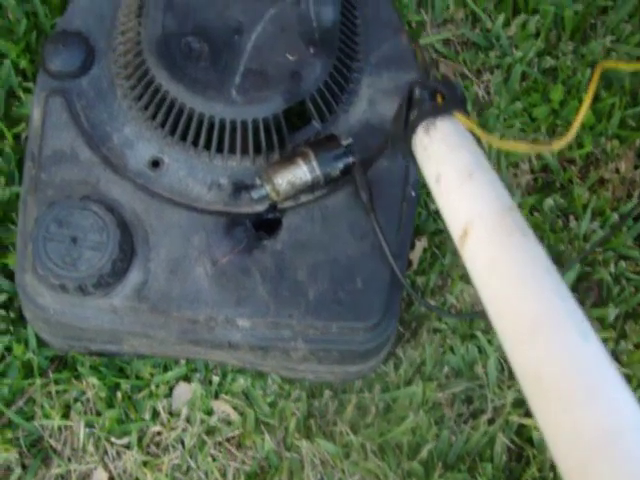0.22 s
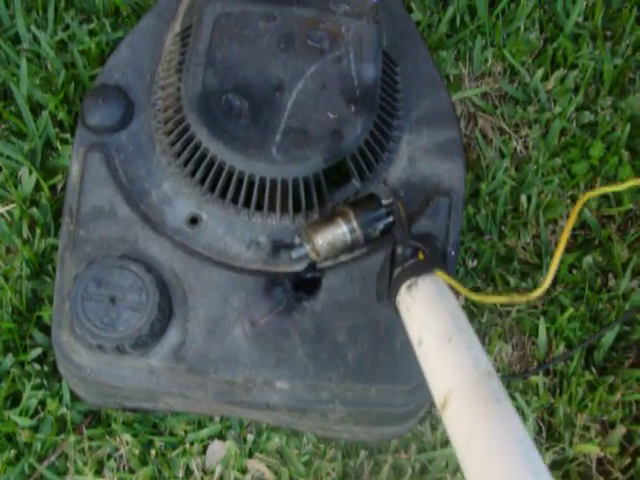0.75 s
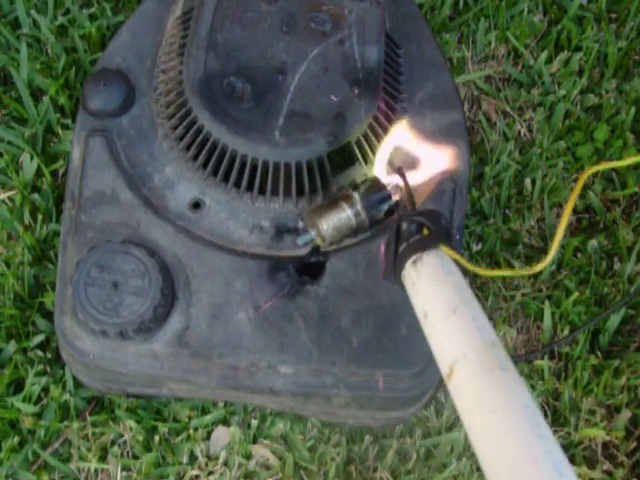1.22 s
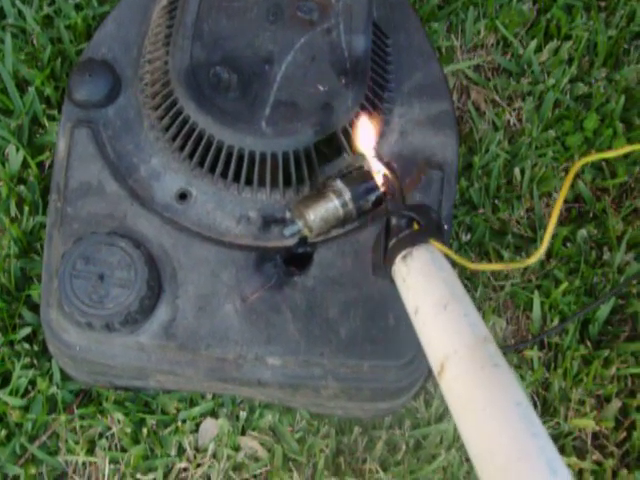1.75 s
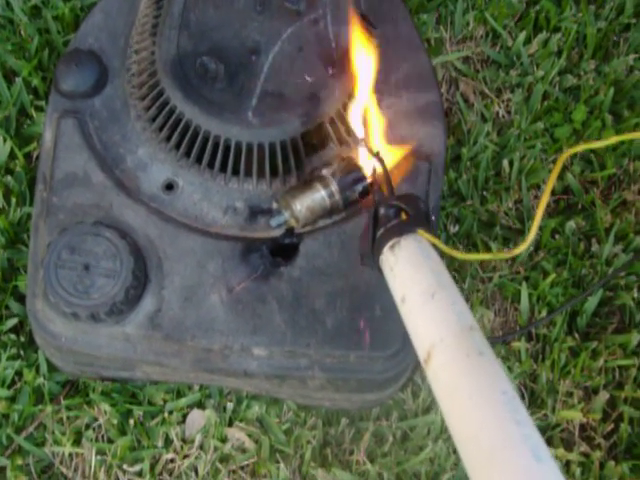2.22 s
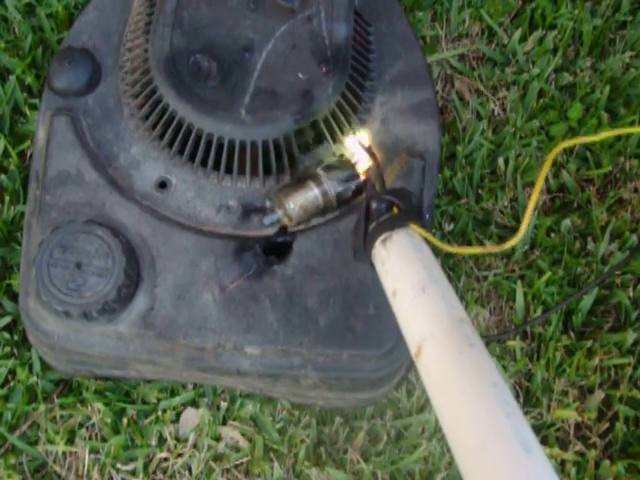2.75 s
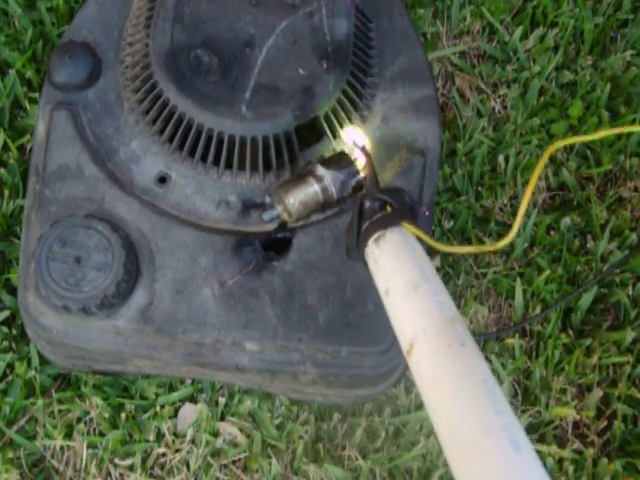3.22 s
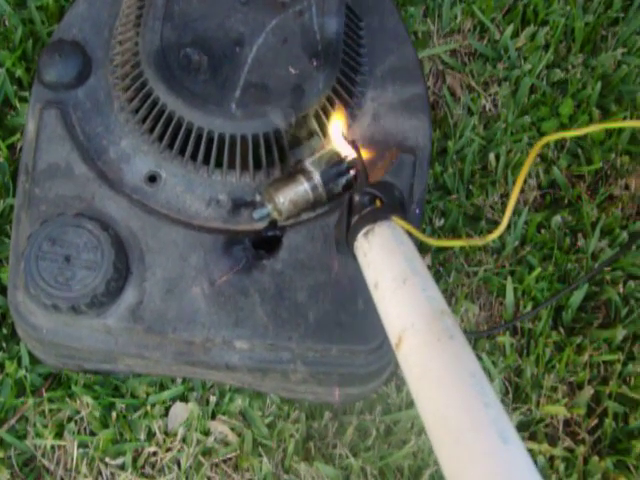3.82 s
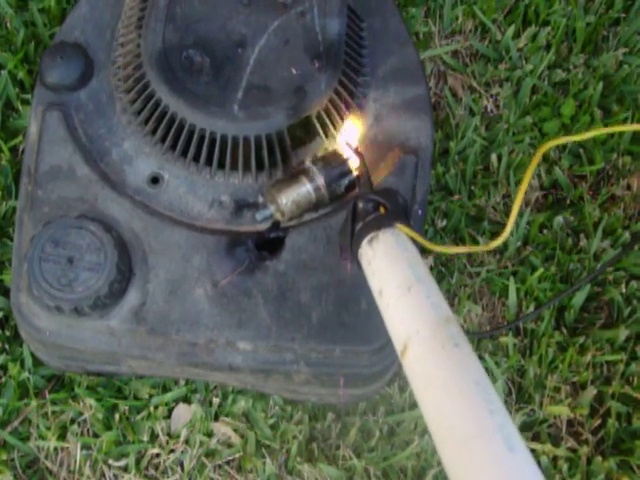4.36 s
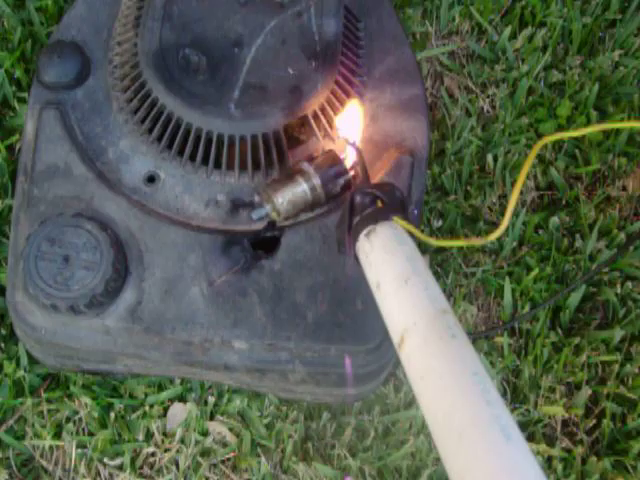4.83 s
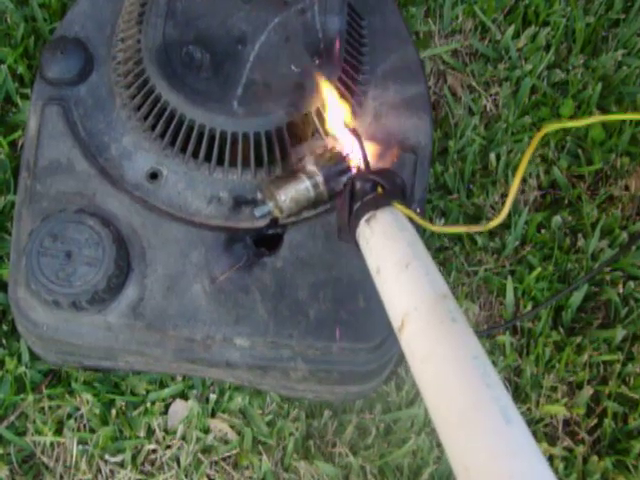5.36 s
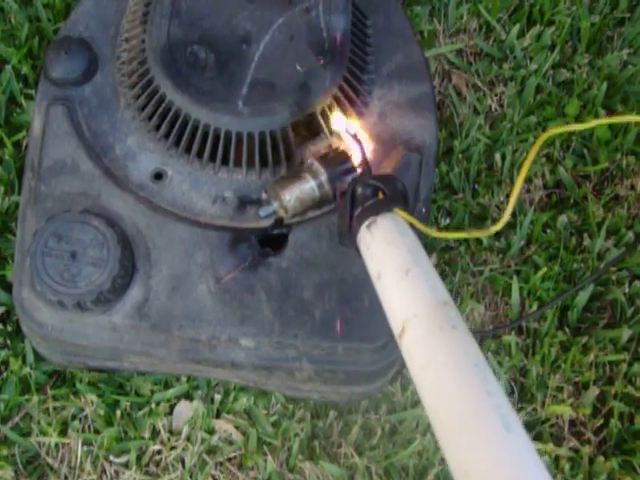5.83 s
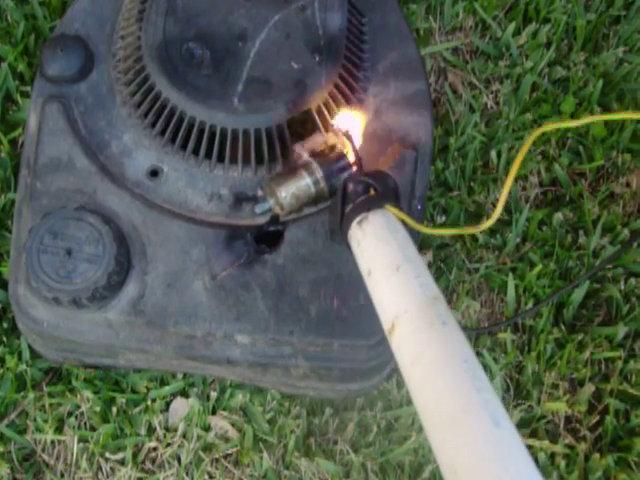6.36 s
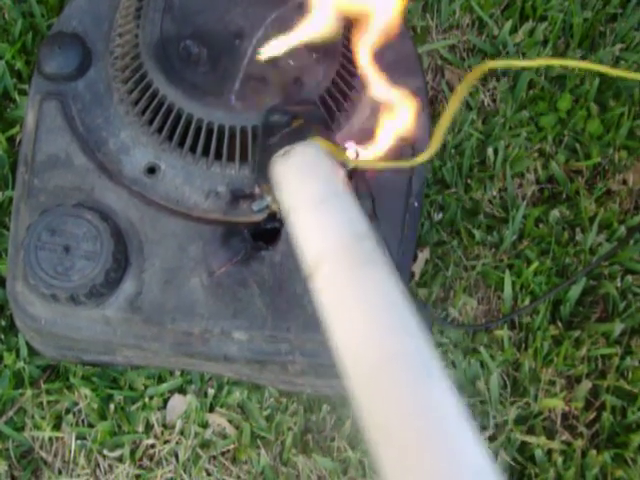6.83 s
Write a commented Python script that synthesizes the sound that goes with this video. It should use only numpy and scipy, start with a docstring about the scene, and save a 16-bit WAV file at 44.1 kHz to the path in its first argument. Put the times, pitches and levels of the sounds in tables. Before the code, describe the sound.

Outdoors, a low motor drone gives way to a loud, ragged mains-frequency electrical buzz full of snapping cracks, which abruptly cuts off.

```python
"""A small engine drones steadily throughout: uneven pops, noise and steady tones. The level of the drone, and
partly of the arc's hum, drops suddenly and creeps up again. A lone crack at 0.88 s precedes a high-voltage
mains arc, which burns from 1.12 s to 6.9 s between a hand-held probe and a small part on a plastic base, on a
lawn. Twice each mains cycle it restrikes: clicks crack and sizzle through resonances, pushes of heated air
thump the base, and sines hum and throb before each break of the flame. A narrow-band input clips the tallest
peaks."""
import sys
import numpy as np
from scipy import signal
from scipy.fft import rfft, irfft
from scipy.io import wavfile
from scipy.ndimage import uniform_filter1d

SR = 44100
rng = np.random.default_rng(int(sys.argv[2]) if len(sys.argv) > 2 else 0)


def unload_wav(signal):
    """Save mono or channel-first audio to the path in sys.argv[1] as 16-bit WAV at rate SR, clipped to [-1, 1]."""
    wavfile.write(
        sys.argv[1],
        SR,
        np.round(np.clip(np.atleast_2d(signal).T, -1, 1) * 32767).astype(np.int16),
    )


def boost_factor(decibels):
    """Convert a level in decibels to a linear amplitude factor."""
    exponent = np.asarray(decibels, float) / 20
    return 10 ** exponent


N = 312228

# the arc jumps to a new footing, then grows until the next jump: start_s, thump_db, sizzle_db (just after it)
JUMPS = [(1.122, -30, -37), (1.147, -24.0, -33.5), (1.189, -32, -44), (1.247, -26, -40),
         (1.288, -39.0, -43.0), (1.3, -32, -39.5), (1.389, -35.0, -41), (1.422, -28.0, -41),
         (1.53, -21.5, -32.5), (1.555, -26.0, -37), (1.589, -18.0, -35.5), (1.64, -16, -30),
         (1.68, -16.5, -23), (1.695, -40, -35.5), (1.722, -23.5, -32), (1.814, -32, -35),
         (1.85, -33.5, -39.5), (1.939, -19, -29.5), (1.996, -28.0, -35.5), (2.051, -18.0, -31.5),
         (2.092, -17, -27.5), (2.11, -23.5, -30.5), (2.172, -14.5, -31.0), (2.264, -28, -31),
         (2.288, -40, -39.5), (2.305, -25.5, -29), (2.355, -35, -35), (2.405, -40, -41),
         (2.439, -30.0, -43), (2.53, -28, -34.5), (2.595, -27, -36), (2.635, -24.5, -35),
         (2.73, -25, -36.5), (2.855, -16.5, -33.5), (2.883, -24.5, -39), (3.066, -23.5, -36.5),
         (3.11, -22.5, -42), (3.14, -23.5, -34.5), (3.205, -25.5, -36.0), (3.255, -20.0, -30.0),
         (3.372, -13.5, -26.5), (3.418, -30.5, -36.5), (3.447, -23.5, -31.5), (3.539, -25, -30),
         (3.572, -20.0, -34.5), (3.705, -23.5, -34), (3.776, -28.5, -37.5), (3.847, -22, -32.5),
         (3.922, -25.0, -39.5), (4.014, -23, -29.5), (4.114, -22.5, -28.5), (4.197, -20.5, -25.5),
         (4.255, -22.5, -32.5), (4.31, -13.5, -31), (4.329, -18, -27), (4.43, -29, -26),
         (4.464, -15.0, -28), (4.5, -29, -33), (4.514, -24.0, -32.5), (4.664, -25, -25.5),
         (4.697, -22.0, -32.0), (4.864, -22.5, -30.5), (4.914, -32.5, -25), (4.964, -18.5, -24.5),
         (5.005, -32, -27), (5.04, -22.5, -26), (5.059, -27, -33), (5.147, -22, -33), (5.325, -13, -27.5),
         (5.36, -16.5, -26), (5.389, -19.5, -28), (5.43, -28, -29.5), (5.489, -25, -37),
         (5.555, -25.5, -35), (5.583, -54, -41.5), (5.597, -28.5, -45), (5.647, -41, -34.5),
         (5.68, -23.5, -34), (5.714, -25.5, -30.5), (5.814, -17.5, -30.5), (5.855, -22.0, -28),
         (5.989, -25.5, -29.5), (6.014, -31.5, -27), (6.072, -21.5, -32), (6.155, -22.5, -28.0),
         (6.19, -13.5, -29.5), (6.207, -17.5, -30), (6.23, -18.5, -22), (6.247, -29, -35), (6.27, -28, -36),
         (6.3, -23.5, -36), (6.321, -42, -38), (6.341, -31, -38.0), (6.422, -27.5, -28.5),
         (6.548, -40, -40), (6.566, -30, -42), (6.614, -23.5, -38.5), (6.647, -28, -43),
         (6.675, -24.5, -42), (6.715, -36, -42.0), (6.73, -25.5, -47), (6.78, -37, -57),
         (6.805, -25.5, -46.0)]
# breakdown of the gap about each nominal current zero, later when the arc is long: time_s, lag_ms (< 0 early)
STRIKE_LAG = [(1.1, -.6), (1.8, -.5), (1.95, 1.2), (2.1, 1), (2.3, -.2), (2.5, -1.1), (3.4, -.6), (3.5, .5),
              (3.6, -.9), (3.85, -.8), (3.95, .3), (5.0, .3), (5.1, -1), (5.3, -.5), (5.4, 1), (5.7, 0),
              (6.9, .4)]
# how far the flame is drawn out, and the colour from where it lands on the part:
# time_s, added_hum_db, sizzle_above_3800_hz_db, thump_above_800_hz_db
STRETCH = [(1.1, -4, 2.5, 3), (1.45, -2.5, 7, -2), (1.7, 1.5, 0.1, 0.1), (2.0, -0.5, -1.5, 2.5),
           (2.25, -1.3, -4.5, -1), (2.55, -4, 2.5, -6), (2.75, 1.5, 8.5, -2.5), (3.101, -2.5, 7, 0.2),
           (3.4, 1.5, 1.5, -1), (3.701, -2, -2, 1), (3.95, 1, 2.5, -0.5), (4.1, 1, 1.5, -1.5),
           (4.5, 1, 0.5, 0.5), (5.0, -0.5, -3, -0.5), (5.2, -1.5, 0, -3.5), (5.5, 2, -1, 2.5),
           (5.75, -3, -5, 2.5), (5.88, 1.5, -5, -3.5), (6.0, 0.5, -7.5, 0.5), (6.28, 5, -3, -0.5),
           (6.4, -1, -3.5, 2), (6.651, 2.5, -4, .4), (6.9, 8.5, 2, -2)]
# the stretched flame throbs deeper just before it tears off: break_s, throb_peak_db
BREAKS = [(1.691, -31.5), (2.878, -39.5), (3.415, -34.5), (5.58, -32.5), (6.316, -25.5), (6.712, -29),
          (6.9, -26)]
# the loudest single cracks: time_s, click_db (before the resonances)
CRACKS = [(0.8782, -11), (1.1655, -15.0), (1.1748, -21.5), (1.233, -19.5), (1.2577, -16), (1.2834, -14.0),
          (1.307, -12.0), (1.4576, -12.5), (1.566, -12.5), (1.6576, -12.5), (1.668, -11), (1.6743, -9.5),
          (1.6826, -12), (1.6911, -8.0), (1.8421, -8), (1.9674, -12.5), (1.9761, -17), (2.1003, -11),
          (2.1084, -11), (2.26, -5.5), (2.2835, -13), (2.3493, -13), (2.8077, -12.5), (2.9494, -15),
          (3.0074, -14), (3.0574, -11), (3.1095, -8.5), (3.1748, -11), (3.2167, -10), (3.3077, -12),
          (3.408, -9.5), (3.582, -15.5), (3.707, -12), (3.8752, -9.0), (3.9086, -11.5), (3.9253, -10.5),
          (4.0086, -9.5), (4.0253, -12), (4.059, -11), (4.2003, -14), (4.2418, -10), (4.25, -9),
          (4.3084, -7.5), (4.4658, -8.5), (4.4836, -7.5), (4.6168, -12.5), (4.6335, -8), (4.642, -10),
          (4.6668, -12), (4.692, -8.5), (4.734, -10), (4.792, -10.0), (4.8004, -7.5), (4.8084, -8),
          (4.8597, -5.5), (4.8654, -12), (4.941, -11.5), (5.1234, -13.5), (5.3592, -8.0), (5.426, -8),
          (5.441, -7.5), (5.4588, -7), (5.4671, -10), (5.4757, -6), (5.5757, -8.5), (5.6415, -12),
          (5.6838, -12.5), (5.8249, -9.5), (5.859, -9), (5.8919, -6), (5.9086, -10.0), (5.9167, -10),
          (5.9585, -9.0), (5.967, -8), (5.992, -8), (6.0751, -8.5), (6.1416, -10), (6.1584, -8),
          (6.2344, -12), (6.2426, -11.5), (6.3175, -11.0), (6.4999, -10.5), (6.5168, -10), (6.5251, -10),
          (6.539, -12), (6.5923, -16.5), (6.7093, -12.5)]
# resonances of the base under the arc, rung by each thump: pitch_hz, width_hz, relative_level_db
BASE_MODES = [(362, 46, -6), (657, 83, 9), (780, 130, -4), (916, 225, 14.5), (1164, 88, -8),
              (1379, 42, -2.5)]
# resonances that colour crack and sizzle: pitch_hz, width_hz, relative_level_db
SNAP_MODES = [(2095, 110, -12.5), (2673, 100, -9.5), (3263, 695, 10.5), (4495, 1160, 9), (4910, 3400, -8)]
# reflections of each crack from the base and the ground: delay_ms, gain (linear)
ECHOES = [(.9, 0.092), (1.5, 0.036), (2.15, -0.13), (3.302, 0.033), (4.6, -0.24)]
# spectrum shared by engine noise and pops: pitch_hz, relative_level_db (per Hz)
ROAR = [(18, -54.5), (30, -19.5), (49, -17), (80, -13), (109, -9.5), (173, -6), (193, -9.5), (236, 6),
        (322, -6), (560, 1), (699, -2.5), (912, -3), (1810, -18), (5020, -29.5), (6000, -32), (7800, -83.5),
        (13200, -120)]
# clean tones of the engine: order (multiple of the shaft rate), level_db (re roar)
SHAFT_ORDERS = [(1, -22), (2, -13), (3, -15.5), (5, -23)]
# steady tones that ride with the engine: pitch_hz, level_db (re roar)
WHINE = [(651, -21.5), (769, -13), (888, -20), (946, -15), (1242, -20), (1418, -18.5), (1597, -30),
         (2541, -30), (3548, -37.5), (4436, -37), (5023, -34)]
# the slow level drops suddenly, creeps up again and holds: start_s, fallen_db, held_db
DROPS = [(0, -24.5, -9.5), (.879, -34.5, -23), (1.288, -37, -33), (1.695, -28, -21), (1.85, -32.5, -5),
         (2.288, -31, -22.5), (2.65, -38, -26), (2.883, -27, -29), (3.066, -31.5, -26.5), (3.418, -35, -21),
         (3.776, -37, -29.5), (4.05, -30, -21), (4.5, -31.5, -26), (5.059, -33, -21.5), (5.43, -31, -25),
         (5.583, -32, -31), (6.05, -30.5, -20), (6.321, -35, -29.5), (6.548, -36.5, -19),
         (6.715, -33.5, -23), (6.9, -30, -19)]

STRIKES_PER_S = 120  # two per mains cycle
THUMP_GROWS_DB_PER_S, SIZZLE_GROWS_DB_PER_S = 29.5, 19
JUMP_S = 0.0058  # every sudden change of level is averaged over this time
ARC_STARTS_S, ARC_ENDS_S, IGNITION_S = JUMPS[0][0], 6.9, .03
POLARITY_DB = 2  # one half of the mains cycle strikes harder than the other
HUM_DB, HUM_FOLLOWS_THUMP = -6.5, .55  # the rest of the hum follows the slow level
SHAFT_HZ = 55.44
CREEP_DB_PER_S, KNEE_DB = 36, 2.5  # the climb eases into the plateau
EDGE_HZ, OVERLOAD, CLIP, OFFSET = 5780, 0.734, .715, -.0033  # levels re full scale


def arc():
    """Superposition: heated-air thump, flame hum and spark sizzle add while the arc burns."""
    t = np.arange(N) / SR
    thump_db, sizzle_db = growing_levels_db()
    stretch_db, edge_db, body_db = stretch_curves()
    hum_db = HUM_DB + stretch_db + HUM_FOLLOWS_THUMP * thump_db + (1 - HUM_FOLLOWS_THUMP) * slow_level_db()
    burning = uniform_filter1d(((t > ARC_STARTS_S) & (t < ARC_ENDS_S)) * 1., 200)
    burning *= np.clip((t - ARC_STARTS_S) / IGNITION_S + .3, 0, 1)  # the first strikes are weak
    layers = boost_factor(thump_db) * thump(body_db)
    layers += boost_factor(hum_db) * hum(hum_db)
    layers += boost_factor(sizzle_db) * sizzle(edge_db)
    return burning * layers


def growing_levels_db():
    """Lengthening of the arc: thump and sizzle levels rise linearly in dB from each jump to the next."""
    age, thump_db, sizzle_db = since(JUMPS)
    width = round(JUMP_S * SR)
    thump_db = uniform_filter1d(thump_db + THUMP_GROWS_DB_PER_S * age, width)
    sizzle_db = uniform_filter1d(sizzle_db + SIZZLE_GROWS_DB_PER_S * age, width)
    return thump_db, sizzle_db


def stretch_curves():
    """Slow drawing-out of the flame: hum level and the two colours interpolate between rows."""
    at, *columns = np.transpose(STRETCH)
    return [np.interp(np.arange(N) / SR, at, column) for column in columns]


def current_zeros():
    """Alternating current: the nominal zeros, in seconds, are evenly spaced, two per cycle."""
    return np.arange(int((N - 1) / SR * STRIKES_PER_S)) / STRIKES_PER_S


def thump(body_db):
    """Thermal expansion: each half cycle the heated air pushes on the base and rings its modes."""
    zero = current_zeros()
    jitter, strength, puff_jitter, puff = rng.standard_normal((4, len(zero)))
    # the main push keeps close to the mains; a weaker puff of either sign reshapes it
    drift_s = .00076 * uniform_filter1d(strength, size=12)
    pushes = train(zero + .0008 + .00005 * jitter + drift_s, boost_factor(strength))
    pushes += train(zero + .0016 + .0006 * puff_jitter, .4 * puff)
    swell = np.hanning(36)  # the hot column takes most of a millisecond to expand
    ringing = rung(np.convolve(pushes, swell)[:N], BASE_MODES)
    body = evened(above(above(ringing, 428), 300))
    wander = np.interp(np.arange(N) / SR, zero, uniform_filter1d(puff_jitter, size=3))
    return tilted(body, 800, body_db + 4.5 * wander)


def hum(hum_db):
    """Power modulation: the flame swells with the power, as sines at the strike rate and twice it."""
    t = np.arange(N) / SR
    phase = 2 * np.pi * STRIKES_PER_S * t
    out = np.sqrt(2) * (np.sin(2 * phase + 1.06) + boost_factor(-16) * np.sin(phase))
    for break_s, db in BREAKS:
        growth = np.exp(np.minimum(t - break_s, 0) / 0.062) * (t < break_s)
        out += boost_factor(db - hum_db) * growth * np.sin(phase)  # cancels the hum level applied later
    return out


def sizzle(edge_db):
    """Dielectric breakdown: a spark of varying strength and colour at each restrike, over plasma hiss."""
    t = np.arange(N) / SR
    zero = current_zeros()
    jitter, drift, size, edge, thin = rng.standard_normal((5, len(zero)))
    lag_s = np.interp(zero, *np.transpose(STRIKE_LAG)) / 1000
    strike = zero + lag_s + .00015 * uniform_filter1d(drift, size=3) + .00002 * jitter
    # a strong crack takes its cycle's place
    apart = abs(strike[:, None] - np.transpose(CRACKS)[0]).min(1) > .003
    size_db = 3.6 * np.minimum(size, .8) + POLARITY_DB * (np.arange(len(zero)) % 2)
    sparks = snap(train(strike, apart * boost_factor(size_db)), 0.0016, 0.099)
    hiss = 0.0053 * rung(rng.standard_normal(N), SNAP_MODES)  # the plasma hisses between strikes
    out = evened(sparks + hiss)
    # each spark takes another path, so its colour differs from the last
    out = tilted(out, 3800, edge_db + 3.45 * np.interp(t, strike, edge))
    thin_db = 3.0 * np.interp(t, strike, thin)
    return tilted(out / boost_factor(thin_db), 2800, thin_db)  # only the part below 2800 Hz varies


def cracks():
    """Impulsive breakdown: single strong discharges radiate clicks."""
    s, db = np.transpose(CRACKS)
    return snap(train(s, boost_factor(db)), 0.0022, 0.09)


def snap(clicks, fade_s, fizz):
    """Impulse response: a sharp rarefaction and a short fizz ring the gap and the base, then echo."""
    fading = np.exp(-np.arange(600) / (fade_s * SR))
    burst = signal.oaconvolve(clicks, fading)[:N] * rng.standard_normal(N)
    drive = fizz * burst - clicks
    direct = 0.43 * drive + 0.21 * rung(drive, SNAP_MODES)
    echoes = sum(gain * np.roll(direct, round(ms * SR / 1000)) for ms, gain in ECHOES)
    base = above(above(rung(clicks, BASE_MODES), 1000), 1000)
    return above(direct + echoes, 1100) - 0.2 * base


def engine():
    """Periodic combustion: exhaust pops and throbbing noise share one spectrum, beneath steady tones."""
    t = np.arange(N) / SR
    fire = np.arange(int(t[-1] * SHAFT_HZ)) / SHAFT_HZ
    strength = np.where(np.arange(len(fire)) % 2, .3, 1)  # strong every second turn
    pops = train(fire, strength * boost_factor(0.29 * rng.standard_normal(len(fire))))
    noise = rng.standard_normal(N) * (1 + 0.045 * np.cos(2 * np.pi * SHAFT_HZ * t))
    roar = muffled(noise + 0.3 * evened(pops))
    pitches = [(order * SHAFT_HZ, db) for order, db in SHAFT_ORDERS] + list(WHINE)
    tones = sum(boost_factor(db) * np.sqrt(2) * np.sin(2 * np.pi * (hz * t + rng.random())) for hz, db in pitches)
    return boost_factor(slow_level_db()) * evened(roar + tones)


def muffled(x):
    """Dispersion: the muffler colours the exhaust and spreads each pop in time, the bass most."""
    hz = np.fft.rfftfreq(N, 1 / SR)
    f, db = np.transpose(ROAR)
    colour = boost_factor(np.interp(np.log(hz + 1), np.log(f + 1), db))
    smear = np.exp(-2j * np.pi * 3.3 * np.log(hz + 30))
    return evened(irfft(rfft(x) * colour * smear, N))


def slow_level_db():
    """Level envelope of engine and, in part, hum: a fall within a few ms, a steady climb, a plateau."""
    age, fallen_db, held_db = since(DROPS)
    short_db = held_db - fallen_db - CREEP_DB_PER_S * age
    eased = held_db - KNEE_DB * np.logaddexp(0, short_db / KNEE_DB)
    return uniform_filter1d(eased, round(JUMP_S * SR))


def since(rows):
    """Piecewise time: for every sample, the time since the latest row began, and that row's columns."""
    s, *columns = np.transpose(rows)
    t = np.arange(N) / SR
    latest = np.maximum(np.searchsorted(s, t, "right") - 1, 0)
    return [t - s[latest]] + [c[latest] for c in columns]


def train(s, size):
    """Impulse train: clicks of given sizes at given times in seconds."""
    out = np.zeros(N)
    np.add.at(out, np.clip(np.round(s * SR).astype(int), 0, N - 1), size)
    return out


def rung(x, modes):
    """Modal resonance: x drives a parallel set of damped two-pole resonators."""
    out = np.zeros(len(x))
    for hz, width, db in modes:
        r = np.exp(-np.pi * width / SR)
        w = 2 * np.pi * hz / SR
        out += boost_factor(db) * signal.lfilter([0, np.sin(w)], [1, -2 * r * np.cos(w), r * r], x)
    return out


def above(x, hz):
    """Radiation efficiency: a small open source radiates little bass, a second-order high-pass."""
    return signal.sosfilt(signal.butter(2, hz, "high", fs=SR, output="sos"), x)


def tilted(x, hz, db):
    """Spectral balance: a curve in dB raises or lowers everything above hz."""
    low = signal.sosfiltfilt(signal.butter(3, hz, fs=SR, output="sos"), x)
    return low + boost_factor(db) * (x - low)


def evened(x):
    """Normalization: scales x to rms 1."""
    return x / np.sqrt(np.mean(x ** 2) + 1e-20)


def scene():
    """Superposition: arc, cracks and engine add at one microphone."""
    return (arc() + cracks() + engine())[None]


def top_cut(x):
    """Nothing passes above the cut-off."""
    return signal.sosfilt(signal.butter(12, 15800, fs=SR, output="sos"), x)


def record(dry):
    """Amplitude limiting: overload between two steep band limits rounds clipped edges; a hard clip follows."""
    limit = signal.firwin(255, EDGE_HZ, window=("kaiser", 11), fs=SR)[None]
    banded = signal.oaconvolve(dry, limit, "same")
    overloaded = np.clip(banded, -OVERLOAD, OVERLOAD)
    narrow = signal.oaconvolve(overloaded, limit, "same")
    mix = np.clip(narrow + OFFSET, -CLIP, CLIP)
    return top_cut(mix)


dry = scene()
out = record(dry)
unload_wav(out)
```